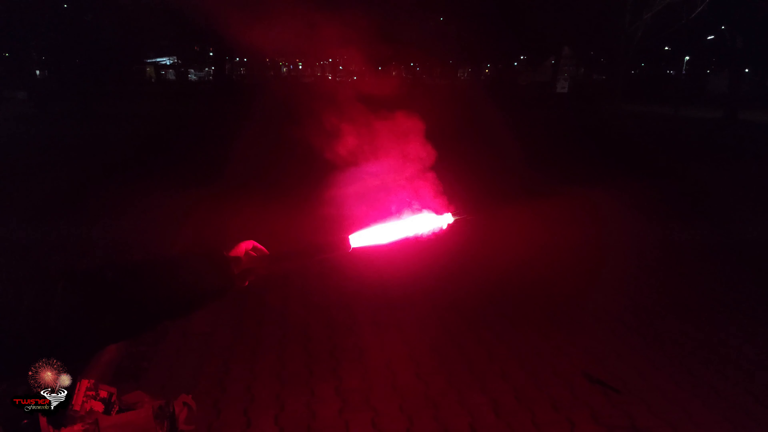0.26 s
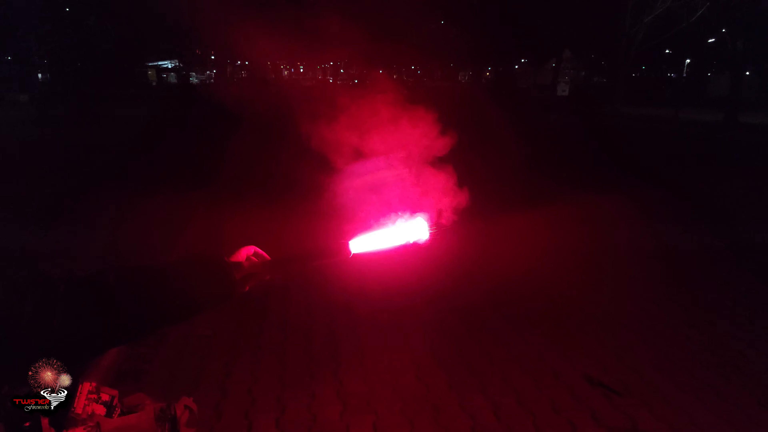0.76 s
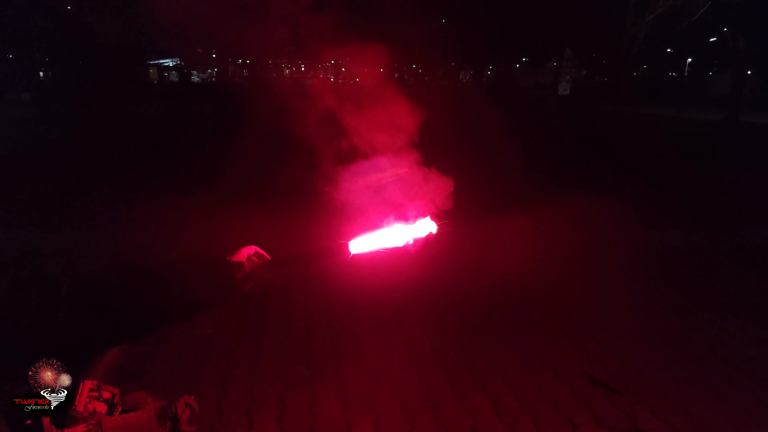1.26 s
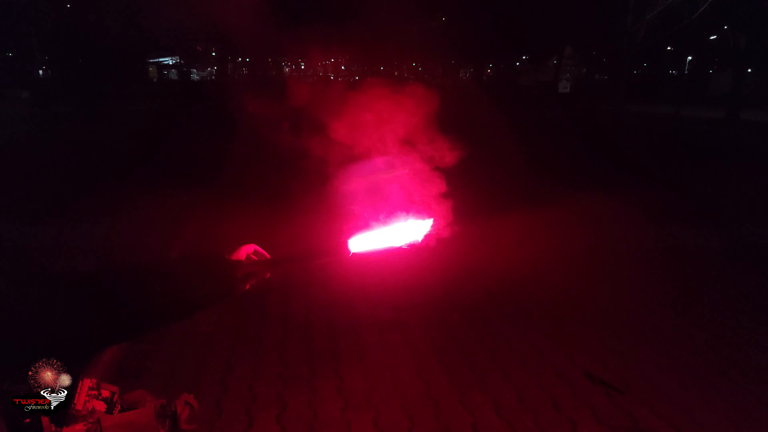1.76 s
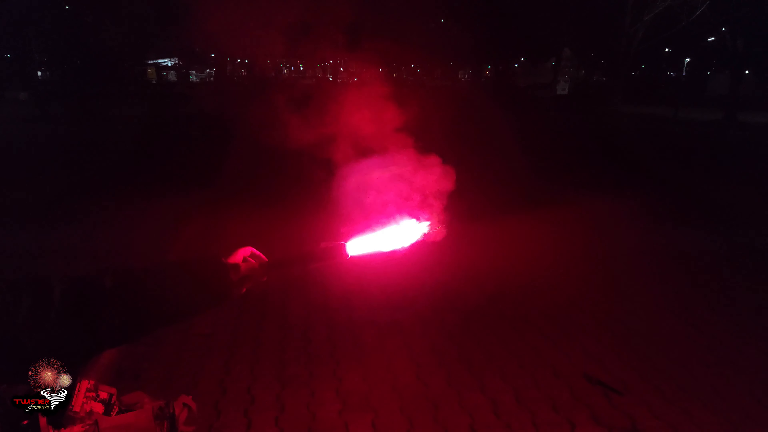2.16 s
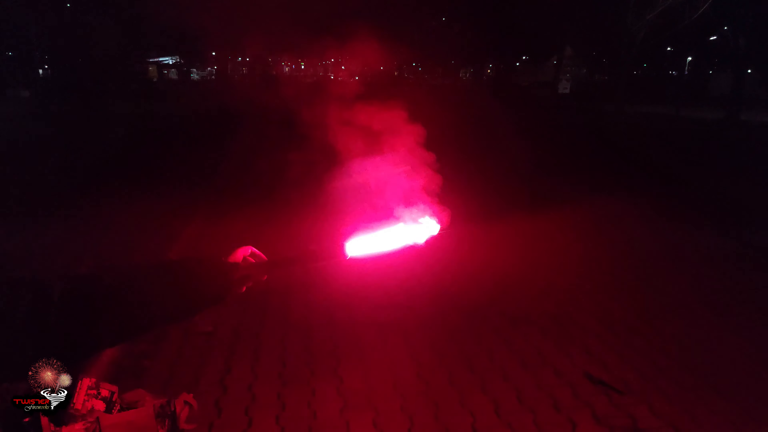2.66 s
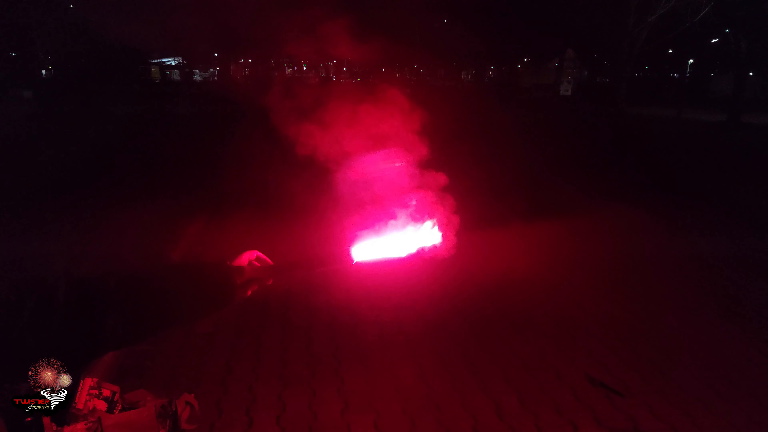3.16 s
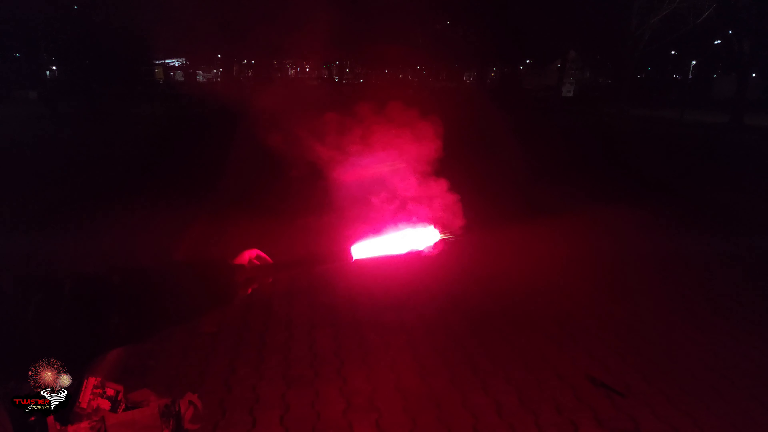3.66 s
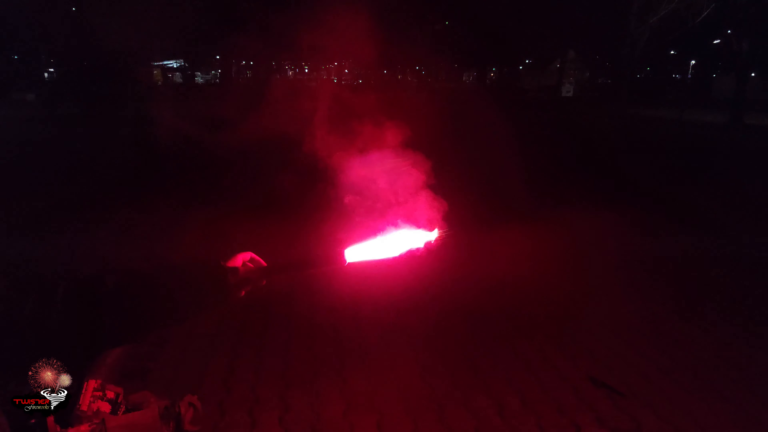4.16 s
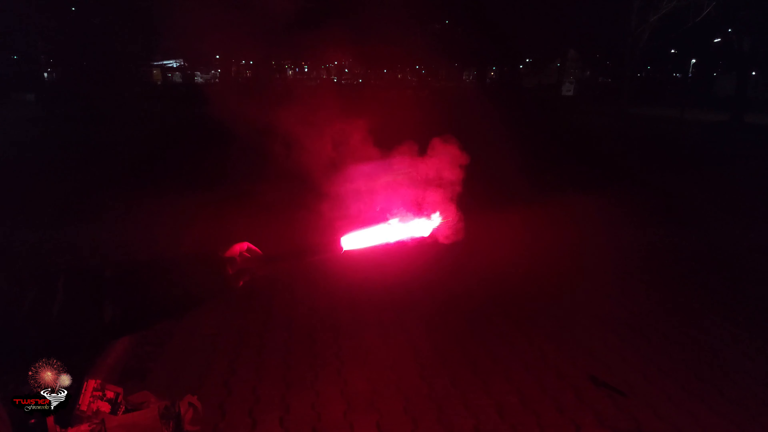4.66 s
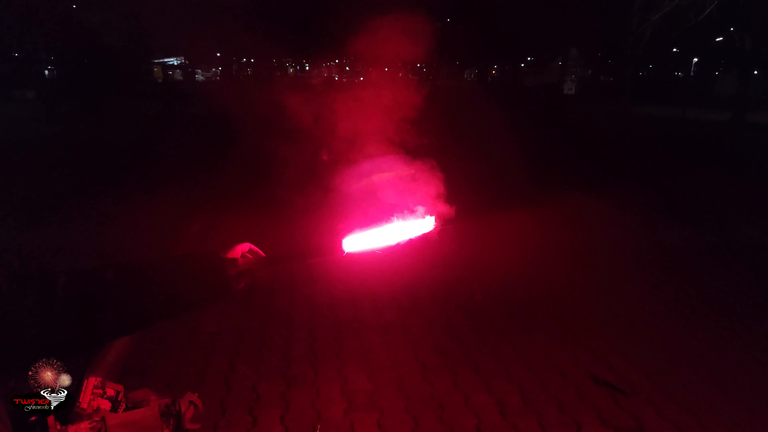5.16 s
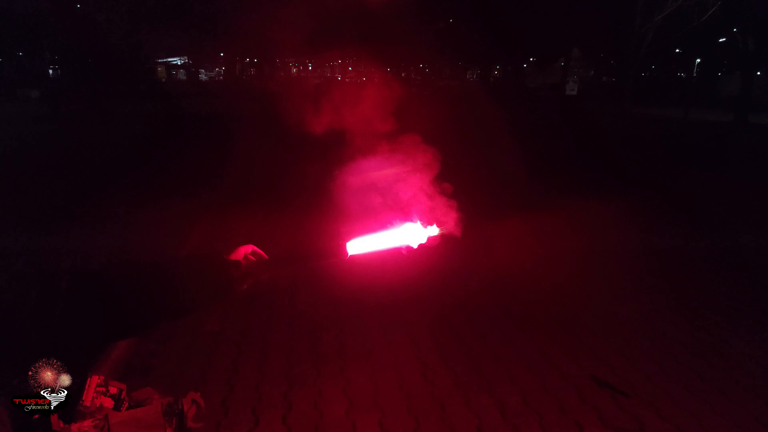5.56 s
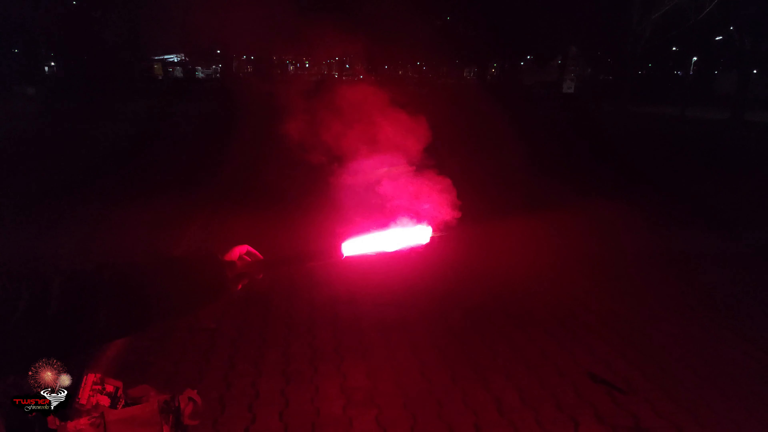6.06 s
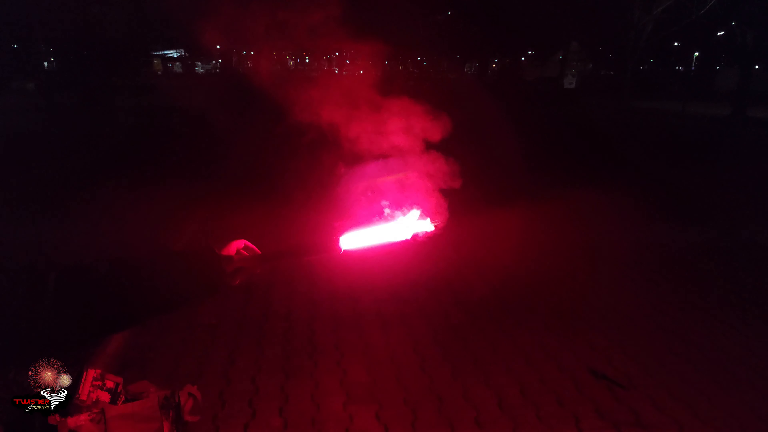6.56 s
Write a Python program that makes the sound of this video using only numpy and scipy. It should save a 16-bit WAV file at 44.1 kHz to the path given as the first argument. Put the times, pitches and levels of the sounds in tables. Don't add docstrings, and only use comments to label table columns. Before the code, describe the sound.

Outdoors on paving at night, a hand flare burns a few metres from a small handheld stereo microphone. Its gas jet makes an unbroken broadband roar and hiss, already going at the start and never stopping, with a fine flutter and slight shifts in brightness. A ground echo gives it a hollow, combed colour. Far behind, traffic rumbles very low and an engine hums briefly and faintly early on.

```python
import sys
import numpy as np
from scipy import signal
from scipy.fft import rfft, irfft, dct, next_fast_len
from scipy.io import wavfile
from scipy.ndimage import map_coordinates

SR = 44100
rng = np.random.default_rng(int(sys.argv[2]) if len(sys.argv) > 2 else 0)


def store_pcm(level_fs):
    pcm = np.round(np.clip(level_fs, -1, 1) * 32767).astype(np.int16)
    wavfile.write(sys.argv[1], SR, np.atleast_2d(pcm).T)


def how_loud(loudness_db):
    steps = np.asarray(loudness_db, float) / 20
    return 10 ** steps


N = 300321
PAD = next_fast_len(N + 4096)
SPECTRUM_HZ = np.fft.rfftfreq(PAD, 1 / SR)
FRAME, FRAME_START = 1024, 160


def seconds():
    return np.arange(N) / SR


def rms_one(x):
    return x / np.sqrt(np.mean(x ** 2) + 1e-20)


def in_hz(rows):
    hz, *columns = np.transpose(rows)
    log_hz = np.log(np.maximum(SPECTRUM_HZ, 1))
    return [np.interp(log_hz, np.log(hz), column) for column in columns]


def through(x, response):
    return irfft(rfft(x, PAD) * response, PAD)[..., :N]


def drift(rate_hz):
    pole = np.exp(-80 * np.pi * rate_hz / SR)
    noise = rng.standard_normal(N // 40 + 2002)
    slow = signal.lfilter([1], [1, -2 * pole, pole * pole], noise)[2000:]
    return np.interp(np.arange(N) / 40, np.arange(len(slow)), rms_one(slow))


def swells(rows, ramp_s):
    t = seconds()
    total_db = 0
    for start_s, hold_s, swell_db in rows:
        inside_s = np.minimum(t - start_s, start_s + hold_s - t)
        total_db = total_db + swell_db * np.clip(inside_s / ramp_s + 1, 0, 1)
    return total_db


def noise_pair(alike, lead_rad):
    shared, left, right = rfft(rng.standard_normal((3, PAD)))
    alike = np.clip(alike, 0, .995)
    common = np.sqrt(alike) * np.array([shared * np.exp(1j * lead_rad), shared])
    own = np.sqrt(1 - alike) * np.array([left, right])
    return np.array([common, own])


def jet():
    # hz, level_db (per Hz)
    jet_bass = [(40, -41), (110, -2), (220, 0.5), (340, 0), (700, -1.7), (1200, -0.33), (1700, 0),
                (2300, -1.17), (3200, -1), (4200, 4.6), (16000, 5)]
    # hz, level_db (per Hz)
    left_port = [(700, -11.3), (2300, -4.5), (3150, -6), (3950, -21), (4400, -17.4), (5800, -17.7),
                 (7250, -22.5), (7480, -32), (7800, -22.3), (9850, -37.5), (11000, -22), (12400, -21),
                 (14700, -35), (15500, -29)]
    right_port = [(700, -10.2), (2300, -3.6), (3620, -4), (4230, -17.8), (5900, -20.4), (7250, -11.5),
                  (8400, -26.3), (9300, -29.8), (10200, -23), (11500, -20.6), (13350, -26), (14000, -21),
                  (14700, -20.8), (15700, -27)]
    # hz, share (0-1)
    likeness = [(200, .96), (800, .985), (2400, .96), (3400, .82), (4000, .55), (4550, .6), (4880, .9),
                (5200, .5), (7000, .68), (7900, .55), (8600, .88), (9800, .3), (12000, .75), (13300, .35),
                (15000, .45)]
    # hz, left_lead_rad
    left_lead = [(200, 0), (1900, .55), (2550, .4), (2900, -.6), (3800, -.6), (4350, -3.14), (5200, -3.2),
                 (6100, -5), (7600, -3.4), (8200, -3.14), (9400, -3.14), (11000, -1.6), (12900, -2),
                 (13500, -3.4)]
    layer_tops = np.array([[3520], [5500], [9500]])
    # start_s, hold_s, scattered_db
    smoke = [
        (0.0, .2, 3.0),
        (3.3, .25, 2.5),
        (4.62, 1.13, -7.0),
    ]
    start_db, slope_db_per_s = (-38.5, -47.5, -50, -52.5), (.22, -.62, -.06, .33)
    smoke_share = (.2, 1, 0, .2)
    tongue_db, flutter_db = (.15, .43, .43, .35), (.54, .67, 1.0, .99)

    ports_db = np.array([in_hz(left_port)[0], in_hz(right_port)[0]])
    noise = noise_pair(in_hz(likeness)[0], in_hz(left_lead)[0])
    noise = noise * how_loud(ports_db + in_hz(jet_bass)[0])
    below = 1 / (1 + (SPECTRUM_HZ / layer_tops) ** 16)
    bands = np.diff(below, axis=0, prepend=0, append=1)
    scattered_db = swells(smoke, .12)
    tongue = drift(17.0)
    out = 0
    for i, band in enumerate(bands):
        common, scattered = irfft(noise * band, PAD)[..., :N]
        layer = rms_one(common + scattered * how_loud(smoke_share[i] * scattered_db))
        level_db = start_db[i] + slope_db_per_s[i] * seconds()
        level_db = level_db + tongue_db[i] * tongue + flutter_db[i] * drift(63)
        out = out + layer * how_loud(level_db)
    return out


def ground_bounce(direct):
    # hz, gain_db, lead_rad
    left_bounce = [(350, -8.4, 0.52), (620, -8.1, -0.45), (900, -9.5, 0.57), (1400, -12.5, -0.12),
                   (1900, -7.3, 0.19), (2450, -5.1, 0.88), (2650, -10.7, 0.85), (2750, -19.0, -0.81),
                   (2850, -9.3, -1.47), (3200, -5.4, -0.42), (3600, -10.2, 0.97), (3800, -24.0, 1.16),
                   (4100, -8.9, 0.63), (5000, -16.8, -1.51)]
    right_bounce = [(350, -9.1, 0.57), (620, -7.5, -0.29), (900, -8.7, 0.67), (1300, -6.6, 0.64),
                    (1600, -10.1, 0.43), (1900, -5.7, 1.22), (2250, -5.0, 0.83), (2600, -6.0, 1.62),
                    (2850, -6.8, 2.88), (3050, -6.2, 5.06), (3300, -6.8, 5.11), (3700, -4.8, 5.29),
                    (4150, -7.9, 6.46), (4500, -9.6, 4.33)]
    # hz, gain_db
    paving = [(300, .7), (2500, .7), (4200, .3), (5200, -1.5), (7000, 0), (9000, -2), (15000, -2)]
    gain_db, lead_rad = np.swapaxes([in_hz(left_bounce), in_hz(right_bounce)], 0, 1)
    turned = through(direct, how_loud(gain_db + in_hz(paving)[0]) * np.exp(1j * lead_rad))
    delay_ms = 4.995 - .0165 * seconds()
    read = np.arange(N) - delay_ms * SR / 1000
    late = [map_coordinates(side, [read], order=3, mode="mirror") for side in turned]
    return np.array(late) * how_loud(-1.0 + .35 * seconds())


def near_echoes(x):
    # delay_ms, left_db, right_db
    reflections = [
        (1.236, -18.5, -12.5),
        (1.66, -21, -24),
    ]
    dull = 1 / (1 + (SPECTRUM_HZ / 4500) ** 4)
    echoes = 0
    for delay_ms, left_db, right_db in reflections:
        gain = how_loud(np.array([[left_db], [right_db]]))
        echoes = echoes + gain * np.exp(-2j * np.pi * SPECTRUM_HZ * delay_ms / 1000)
    return through(x, 1 + dull * echoes)


def shade(x):
    start_db, slope_db_per_s = np.array([[3.2], [3.3]]), np.array([[-1.05], [-.95]])
    top = through(x, 1 / (1 + (13400 / np.maximum(SPECTRUM_HZ, 1)) ** 30))
    level_db = start_db + slope_db_per_s * seconds() + 1.4 * drift(12)
    return x + top * (how_loud(level_db) - 1)


def hum():
    hold_s, rise_db_per_s, fall_db_per_s = .68, 34, 8
    t = seconds() - 1.322
    ramps_db = np.minimum(rise_db_per_s * t, fall_db_per_s * (hold_s - t))
    level_db = -55 + np.minimum(0, ramps_db)
    pitch_hz = 114.0 + 1.3 * t + .22 * drift(1.7)
    phase = 2 * np.pi * np.cumsum(pitch_hz) / SR
    return np.sqrt(2) * np.sin(phase) * how_loud(level_db + .97 * drift(3.4))


def town():
    # hz, level_db (per Hz)
    town_colour = [(12, -22), (25, -10), (45, -1.5), (58, -2), (75, -9), (100, -8), (200, -16.5),
                   (400, -38.5)]
    # start_s, hold_s, swell_db
    traffic = [
        (.85, 0.32, 0.5),
        (1.7, 0.49, 2.5),
        (3.92, 0.16, 2),
        (5.8, 0.18, -2),
    ]
    spectrum = noise_pair(.92, 0).sum(axis=0) * how_loud(in_hz(town_colour)[0])
    rumble = irfft(spectrum, PAD)[:, :N]
    return rms_one(rumble) * how_loud(-50 + swells(traffic, .15))


def scene():
    direct = jet()
    flare = shade(near_echoes(direct + ground_bounce(direct)))
    return flare + town() + hum()


def sine_window():
    return np.sin(np.pi * (np.arange(2 * FRAME) + .5) / (2 * FRAME))


def lapped(x):
    before, after = 2 * FRAME - FRAME_START, 2 * FRAME + (FRAME_START - N) % FRAME
    blocks = np.pad(x, ((0, 0), (before, after))).reshape(2, -1, FRAME)
    frames = np.concatenate([blocks[:, :-1], blocks[:, 1:]], axis=2) * sine_window()
    a, b, c, d = np.split(frames, 4, axis=2)
    folded = np.concatenate([-c[..., ::-1] - d, a - b[..., ::-1]], axis=2)
    return dct(folded, 4, norm="ortho")


def unlapped(lines):
    u, v = np.split(dct(lines, 4, norm="ortho"), 2, axis=2)
    frames = np.concatenate([v, -v[..., ::-1], -u[..., ::-1], -u], axis=2) * sine_window()
    first, second = np.split(frames, 2, axis=2)
    joined = (first[:, 1:] + second[:, :-1]).reshape(2, -1)
    return joined[:, FRAME - FRAME_START:][:, :N]


def coarse_treble(x):
    # hz, step_db
    step_sizes = [(3440, -40.0), (4900, -40), (7000, -40.5), (9000, -44.5), (13000, -42), (15500, -44)]
    band_lines, from_hz, cutoff_hz = 32, 3440, 15735
    frame_wander_db, band_wander_db, sum_bias_db = 1.3, 2.47, -1.2
    lines = lapped(x)
    sides = lines.reshape(2, -1, FRAME // band_lines, band_lines)
    sums = np.array([sides[0] + sides[1], sides[0] - sides[1]]) / 2
    sides_db, sums_db = [
        10 * np.log10(np.mean(pair ** 2, axis=3, keepdims=True) + 1e-20).sum(axis=0)
        for pair in (sides, sums)]
    as_sums = sums_db + 6 + sum_bias_db < sides_db
    hz = (np.arange(FRAME) + .5) * SR / (2 * FRAME)
    wander_db = frame_wander_db * rng.standard_normal((len(as_sums), 1, 1))
    wander_db = wander_db + band_wander_db * rng.standard_normal(as_sums.shape)
    band_hz = hz[band_lines // 2::band_lines, None]
    step = how_loud(np.interp(band_hz, *np.transpose(step_sizes)) + wander_db)
    held = np.where(as_sums, sums, sides)
    count = np.floor(np.abs(held / step) ** .75 + .4054)
    held = np.sign(held) * step * count ** (4 / 3)
    held = np.where(as_sums, [held[0] + held[1], held[0] - held[1]], held).reshape(lines.shape)
    return unlapped(np.where(hz < from_hz, lines, held * (hz < cutoff_hz)))


def roll_off(x):
    return signal.sosfilt(signal.butter(12, 16000, fs=SR, output="sos"), x)


def record(dry):
    mix = coarse_treble(dry)
    return roll_off(mix)


dry = scene()
out = record(dry)
store_pcm(out)
```